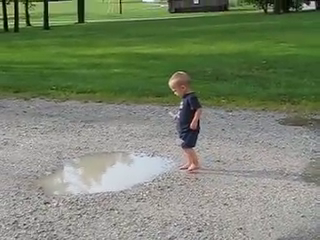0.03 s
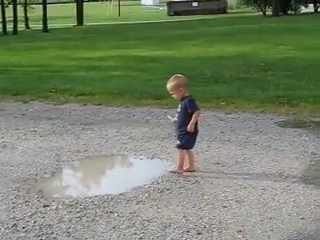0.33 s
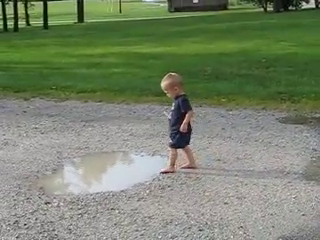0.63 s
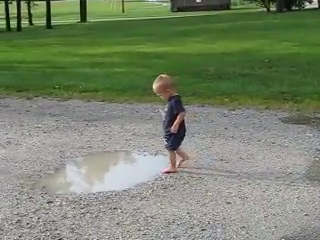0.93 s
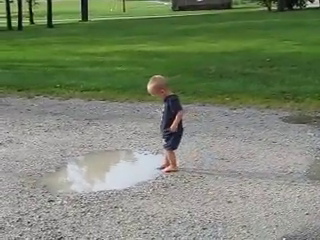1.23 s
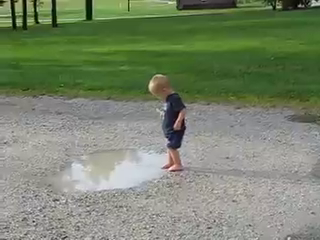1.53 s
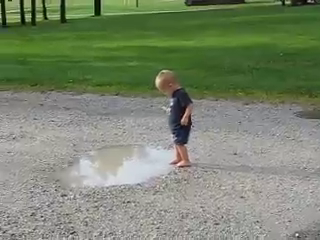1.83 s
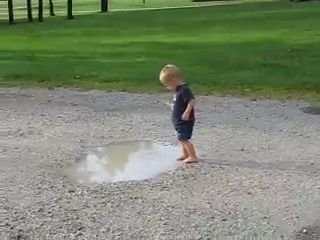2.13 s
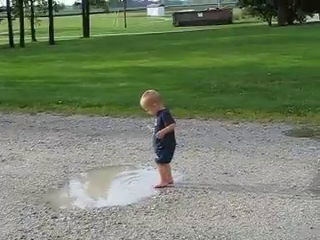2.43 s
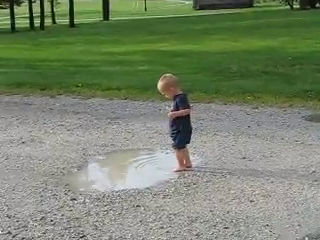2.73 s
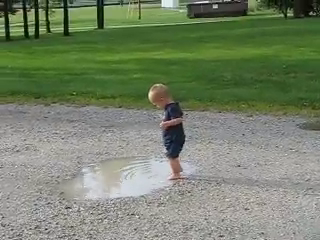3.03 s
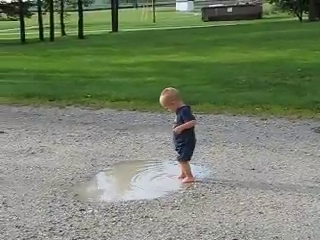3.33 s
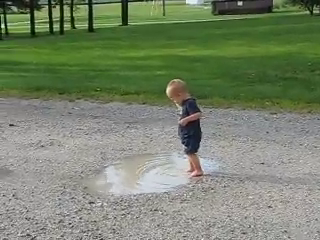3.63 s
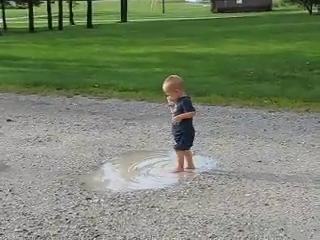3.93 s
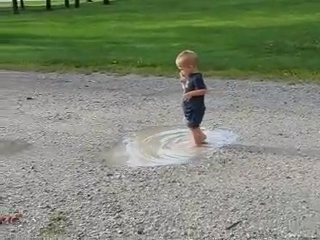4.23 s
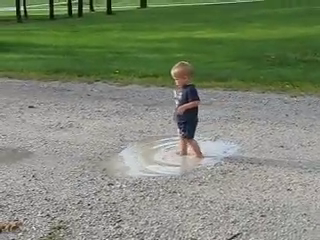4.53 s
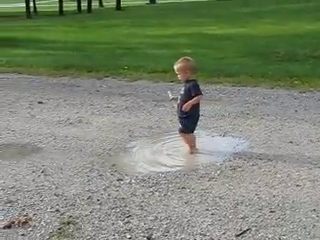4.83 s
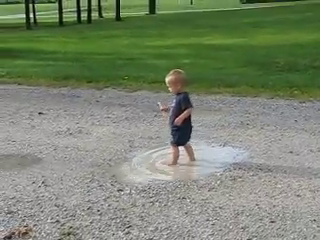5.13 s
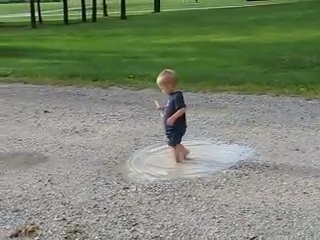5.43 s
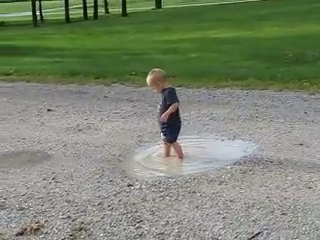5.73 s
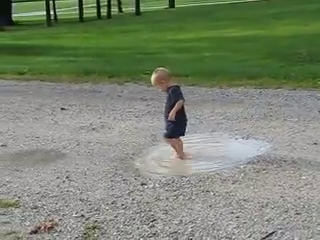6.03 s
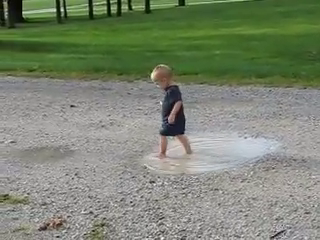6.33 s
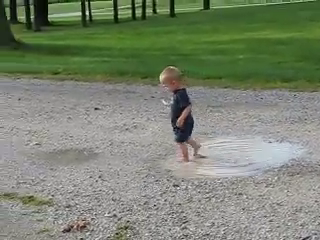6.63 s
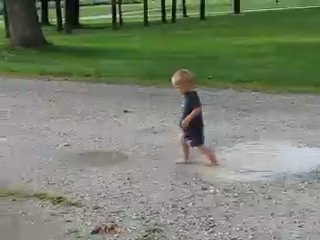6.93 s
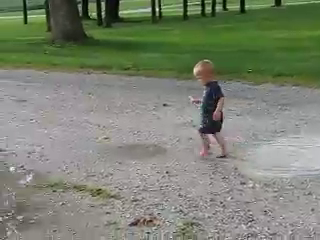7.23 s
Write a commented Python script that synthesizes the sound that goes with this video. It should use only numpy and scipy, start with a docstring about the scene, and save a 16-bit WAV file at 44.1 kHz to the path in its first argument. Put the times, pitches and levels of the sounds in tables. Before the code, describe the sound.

Small feet wade slowly through a shallow puddle with soft splashes and drips, over a steady motor hum and faint crickets.

```python
"""A gravel drive: a toddler wades slowly through a shallow puddle. Each step churns up swarms of tiny
bubbles as slosh and spray; soles and water smack down, drips fall back, larger bubbles ring singly.
A hand-held camera's casing takes a few hollow knocks. A big electric motor hums steadily nearby,
crickets chirp with their wings in the grass, and light wind rumbles on the microphone ports."""
import sys
import numpy as np
from scipy import signal
from scipy.fft import rfft, irfft, next_fast_len
from scipy.io import wavfile
from scipy.ndimage import uniform_filter1d, map_coordinates

SR = 44100
rng = np.random.default_rng(int(sys.argv[2]) if len(sys.argv) > 2 else 0)


def generate_wav(signal):
    """Clip the signal to [-1, 1] and save it as 16-bit WAV at the path in sys.argv[1]."""
    frames = np.transpose(np.atleast_2d(signal))
    scaled = np.clip(frames, -1, 1) * 32767
    pcm = np.round(scaled).astype(np.int16)
    wavfile.write(sys.argv[1], SR, pcm)


N = 325899


def amp(db):
    """Decibels to gain."""
    return 10 ** (np.asarray(db) / 20)


def unit(x):
    """Scale to rms 1."""
    return x / np.sqrt(np.mean(x ** 2) + 1e-20)


def along(points, hz):
    """(Hz, value) points read on a log axis."""
    point_hz, values = np.transpose(points)
    return np.interp(np.log(hz + 1), np.log(point_hz + 1), values)


def clock(length_s=N / SR):
    """Sample times in seconds."""
    return np.arange(round(length_s * SR)) / SR


def wobble(rate_hz):
    """A smooth random curve, rate_hz knots a second."""
    knots = rng.standard_normal(int(N * rate_hz / SR) + 4)
    return map_coordinates(knots, [np.arange(N) * rate_hz / SR])


def filtered(x, response):
    """Apply a gain given as a function of Hz."""
    size = x.shape[-1]
    padded = next_fast_len(size + 2048)
    return irfft(rfft(x, padded) * response(np.fft.rfftfreq(padded, 1 / SR)), padded)[..., :size]


def band(x, centre_hz, width_oct):
    """A bell-shaped band on a log-frequency axis."""
    return filtered(x, lambda hz: np.exp(-(np.log2((hz + 1) / centre_hz) / width_oct / 2) ** 2))


def placed(x, pan_db):
    """Stereo, leaning left by pan_db."""
    return x * amp([[pan_db / 2], [-pan_db / 2]])


def add(track, start_s, sound):
    """Mix a sound into the track."""
    part = track[..., max(round(start_s * SR), 0):][..., :sound.shape[-1]]
    part += sound[..., :part.shape[-1]]


# Each row: start in seconds, length in seconds, slosh level in dB, slosh centre in Hz,
# slosh spread in octaves, spray level in dB.
FOOTSTEPS = [(0.014, .095, -39, 1050, 0.29, -71), (1.152, 0.045, -38, 1490, 0.59, -51),
             (2.482, .085, -46, 2000, 0.89, -55), (2.677, .05, -40.5, 2750, 0.87, -60),
             (3.897, 0.027, -33, 1090, 0.41, -42.5), (4.574, 0.068, -40, 960, .44, -55.5),
             (5.226, 0.041, -45.5, 2500, 0.83, -56), (5.505, 0.036, -39, 2420, 0.55, -53),
             (6.047, .12, -51, 2800, .65, -65), (6.118, 0.043, -39.5, 700, 0.19, -66),
             (6.647, .045, -38.5, 1700, 0.72, -56), (6.787, .045, -50, 3940, 0.88, -58),
             (7.178, 0.044, -39.5, 1110, .3, -61), (7.338, 0.038, -51, 6000, 0.3, -51)]


def steps(spray_hz, spray_oct):
    """Each step sloshes water aside and throws up spray a moment later."""
    out = np.zeros((2, N))
    for start_s, length_s, slosh_db, slosh_hz, slosh_oct, spray_db in FOOTSTEPS:
        slosh = amp(slosh_db) * churn(length_s, slosh_hz, slosh_oct, fizz=0.64)
        spray = amp(spray_db) * churn(length_s, spray_hz, spray_oct, fizz=0.6)
        add(out, start_s, slosh)
        add(out, start_s + 0.13 * length_s, spray)
    return out


def churn(length_s, centre_hz, spread_oct, fizz):
    """Stirred water: a quick swell of tiny bubbles on a wash of noise."""
    swarm = bubble_swarm(length_s, centre_hz, spread_oct, per_s=900, decay_cycles=2.4, spread_db=4.0)
    wash = unit(band(rng.standard_normal((2, len(swarm))), centre_hz, 0.98 * spread_oct))
    swell = np.sin(np.pi * np.linspace(0, 1, len(swarm)) ** 0.88)
    return swell * unit(swarm + fizz * wash)


def bubble_swarm(length_s, centre_hz, spread_oct, per_s, decay_cycles, spread_db):
    """Tiny bubbles of mixed size start at random, each ringing for a few cycles."""
    size, t = round(length_s * SR), clock(0.0086)
    draws = np.clip(rng.standard_normal((int(per_s * length_s) + 4, 2)), -2, 2)
    hz = np.minimum(centre_hz * 2 ** (spread_oct * draws[:, :1]), 0.45 * SR)
    envelopes = np.exp(-hz * t / decay_cycles) * (1 - np.exp(-2 * hz * t))
    rings = amp(spread_db * draws[:, 1:]) * envelopes * np.sin(2 * np.pi * hz * t)
    positions = rng.integers(0, size, (len(hz), 1)) + np.arange(len(t))
    return unit(np.bincount(positions.ravel(), rings.ravel(), size)[:size])


# Each row: start in seconds, level at the crest in dB, centre in Hz, width in octaves, t60 in seconds.
WATER_SLAPS = [(1.1862, -37.5, 7000, .7, 0.016), (2.5297, -25, 1100, .8, 0.0083),
               (3.9, -27, 2200, .55, 0.0083), (5.5133, -21.5, 2840, .33, 0.0068),
               (5.646, -37, 7960, 0.31, 0.0063), (6.303, -33.5, 5160, 0.36, .013),
               (6.655, -23, 1000, 0.44, 0.01), (6.9162, -30.5, 6840, 0.59, 0.028)]


def slaps(rise_s):
    """A sole or a lump of water smacks down: a brief crack, partly different at each port."""
    out, t = np.zeros((2, N)), clock(0.079)
    for start_s, db, centre_hz, width_oct, t60_s in WATER_SLAPS:
        noise = rng.standard_normal(len(t)) + rng.standard_normal((2, len(t)))
        envelope = amp(-60 * t / t60_s) * (1 - np.exp(-t / rise_s))
        crack = unit(envelope * band(noise, centre_hz, width_oct)) / unit(envelope).max()
        add(out, start_s, amp(db) * crack)
    return out


# Each row: start in seconds, pitch in Hz, level in dB.
LARGE_BUBBLES = [(1.168, 2500, -38), (2.531, 4400, -30.5), (2.669, 2040, -29.5), (3.096, 2540, -33),
                 (3.837, 1150, -31), (3.919, 8100, -29), (4.847, 4750, -30.5), (5.502, 2130, -23.5),
                 (5.528, 4100, -27), (5.627, 2750, -28), (5.772, 2060, -30), (6.109, 2480, -27),
                 (6.254, 3340, -28), (6.26, 6900, -33), (6.647, 1750, -24), (6.658, 2760, -27),
                 (6.675, 4270, -28), (6.899, 4360, -32), (6.92, 4200, -23.5), (7.127, 3400, -33),
                 (7.147, 3500, -24)]


def large_bubbles(pan_db):
    """The larger trapped bubbles ring out singly around the feet."""
    out = np.zeros(N)
    for start_s, hz, db in LARGE_BUBBLES:
        add(out, start_s, amp(db) * plink(hz))
    return placed(out, pan_db)


def plink(hz, t60_cycles=25.6, pitch_rise=0.039):
    """A drop snaps on the surface and traps a bubble whose pitch climbs; small bubbles die sooner."""
    t60_s = t60_cycles / hz
    t = clock(1.5 * t60_s)
    ring = np.sin(2 * np.pi * hz * (t + pitch_rise * t * t / t60_s / 2))
    snap = 0.19 * unit(band(rng.standard_normal(len(t)), hz, width_oct=0.96))
    onset = 1 - np.exp(-(2 * hz * t) ** 2)  # the bubble pinches off within half a cycle
    return amp(-60 * t / t60_s) * onset * (ring + snap)


def drips(per_step, fall_s=0.45, centre_hz=6470, spread_oct=0.99, spread_db=6, width_db=8):
    """After every step a few drips fall back, louder as the feet get wetter."""
    soaked_s, soaked_db, dry_loss_db = 10, -33.5, 12
    out = np.zeros((2, N))
    for start_s, length_s, *_ in FOOTSTEPS:
        loudest_db = soaked_db - dry_loss_db * max(1 - start_s / soaked_s, 0)
        for delay, softness, pitch, pan in rng.random((per_step, 4)):
            hz = centre_hz * 2 ** (spread_oct * (2 * pitch - 1))
            drip = amp(loudest_db - spread_db * softness) * plink(hz)
            add(out, start_s + length_s + fall_s * delay, placed(drip, width_db * (pan - 0.5)))
    return out


def gravel(x, t60_s, tail_db):
    """The stony ground adds a very short scattered tail, different at each port."""
    t = clock(0.05)
    tail = rng.standard_normal((2, len(t))) * amp(-60 * t / t60_s)
    tail /= np.linalg.norm(tail[0])
    return x + amp(tail_db) * signal.fftconvolve(x, tail, axes=1)[:, :N]


# Each row: start in seconds, strike gain in dB, pitch in Hz, left minus right in dB.
CASING_KNOCKS = [(2.4846, -15, 910, 10), (3.068, -11, 1060, -7), (3.9005, -18.5, 900, 1)]
# Each row: multiple of the pitch, relative level in dB, t60 in seconds.
CASING_MODES = [(.76, -9.5, .02), (1, 0, 0.0059), (1.07, -5, 0.034), (1.2, -12, .018),
                (2.55, -11.5, 0.0084)]


def knocks(lag_s, highpass_hz, rise_s=0.00029):
    """A finger knocks the casing; the ring reaches the farther port a moment later."""
    out, t = np.zeros((2, N)), clock(0.06)
    for start_s, db, pitch_hz, pan_db in CASING_KNOCKS:
        ring = sum(amp(mode_db - 60 * t / t60_s) * np.sin(2 * np.pi * pitch_hz * ratio * t)
                   for ratio, mode_db, t60_s in CASING_MODES)
        left, right = placed(amp(db) * ring * (1 - np.exp(-t / rise_s)), pan_db)
        add(out[0], start_s + lag_s * (pan_db < 0), left)
        add(out[1], start_s + lag_s * (pan_db >= 0), right)
    highpass = signal.butter(2, highpass_hz, "high", fs=SR, output="sos")  # a small casing has no bass
    return signal.sosfilt(highpass, out)


# Each row of both tables: frequency in Hz, rms level in dB.
HUM_LINES = [(44.0, -49.5), (58.5, -43.5), (74.4, -54), (104.7, -49), (117.1, -46.5), (120.0, -24.5),
             (134.6, -42), (161.2, -51), (175.6, -53), (178.3, -67), (181.3, -52), (222.6, -62.5),
             (225.2, -62), (237.1, -51.5), (240.1, -34), (254.7, -44.5), (298.5, -51.5), (301.6, -56.5),
             (357.2, -58), (359.8, -49), (418.5, -52.5), (468.3, -55), (711.1, -85), (719.9, -65.5)]
WHINE_LINES = [(3512, -79), (3864, -76), (4098, -73), (7852, -76), (7882, -81)]


def motor():
    """Mains hum with sidebands spaced by the turning rotor, under a thin whine."""
    hum = tones(HUM_LINES, waver_db=0.15, drift_rad=0.29)
    whine = tones(WHINE_LINES, waver_db=2.5, drift_rad=0.16)
    return hum + whine


def tones(lines, waver_db, drift_rad):
    """Steady sines that waver in level and phase."""
    out, t = np.zeros(N), clock()
    for hz, db in lines:
        peak = np.sqrt(2) * amp(db + waver_db * wobble(2.17))
        phase = 2 * np.pi * (hz * t + rng.random()) + drift_rad * wobble(0.9)
        out += peak * np.sin(phase)
    return out


# Each row: centre in Hz, half-width in Hz, rms level in dB.
VENT_RESONANCES = [(374, 87, -51.5), (596, 17, -56.5), (987, 14, -57.5)]


def ventilation(flutter_db):
    """Air rushes through the motor's housing, fluttering on its way over the lawn."""
    out = np.zeros((2, N))
    for centre_hz, width_hz, db in VENT_RESONANCES:
        noise = rng.standard_normal(N) + 0.29 * rng.standard_normal((2, N))
        resonance = filtered(noise, lambda hz: 1 / (1 + ((hz - centre_hz) / width_hz) ** 2))
        out += amp(db + flutter_db * wobble(8)) * unit(resonance)
    return out


# Each row: pitch in Hz, chirp length in seconds, wing strokes per second, rms level in dB.
CRICKET_VOICES = [(7650, 0.093, 85, -62), (4250, .17, 45.6, -61.5), (4550, .17, 45.7, -62.5)]
# Each row: voice index, start in seconds, end in seconds, chirp period in seconds.
CHIRP_BOUTS = [(0, .15, 1.9, .414), (0, 2.33, 4.9, .414), (0, 5.51, 7.38, .465), (1, .22, 2.9, .505),
               (2, .04, 5.9, 1.89)]


def crickets(pulse_hz):
    """Three chirpers keep their own beat over a trill that gives way to a pulsing call."""
    chirps, t = np.zeros((2, N)), clock()
    for voice, start_s, end_s, period_s in CHIRP_BOUTS:
        pitch_hz, length_s, stroke_hz, db = CRICKET_VOICES[voice]
        for onset_s in np.arange(start_s, end_s, period_s):
            add(chirps, onset_s, amp(db) * chirp(length_s, stroke_hz, pitch_hz))
    handover = np.interp(t, [3.3, 4.2], [0, 1])
    trill = amp(-69.5) * (1 - handover) * wing(pitch_hz=6960, width_hz=70)
    pulses = np.sin(np.pi * pulse_hz * t + 0.5 * wobble(2.1)) ** 2
    call = amp(-70) * handover * pulses * wing(pitch_hz=6520, width_hz=130)
    return chirps + trill + call


def chirp(length_s, stroke_hz, pitch_hz):
    """A short train of wing strokes, each ringing in a narrow band."""
    t = clock(length_s)
    strokes = np.abs(np.sin(np.pi * t / length_s)) ** 0.25 * np.sin(np.pi * stroke_hz * t) ** 2
    return unit(strokes * band(rng.standard_normal((2, len(t))), pitch_hz, width_oct=0.011))


def wing(pitch_hz, width_hz):
    """A cricket's ringing wing, blurred by the grass on its way to each port."""
    noise = rng.standard_normal((2, N))
    return unit(filtered(noise, lambda hz: np.exp(-((hz - pitch_hz) / width_hz) ** 2)))


# Each row: time in seconds, level in dB.
GUST_CURVE = [(0, -62), (2.0, -49), (2.2, -35), (2.55, -30), (2.8, -45), (3.1, -47), (3.3, -51),
              (7.39, -53)]


def wind():
    """A light gust buffets the ports, partly each on its own."""
    swirl = rng.standard_normal(N) + 1.3 * rng.standard_normal((2, N))
    rumble = unit(band(swirl, centre_hz=36, width_oct=0.56))
    level_db = np.interp(clock(), *np.transpose(GUST_CURVE)) + 2.8 * wobble(8.1)
    return placed(amp(level_db) * rumble, pan_db=-7)


# Each row: frequency in Hz, relative spectral density in dB.
AIR_SPECTRUM = [(20, 6), (42, 8.5), (110, 7.5), (200, 6), (400, 1), (700, -5), (1050, -6.5), (2000, -12.5),
                (3300, -17.5), (4900, -22.5), (7600, -25), (8600, -30), (13000, -36), (16000, -40)]
# Each row: frequency in Hz, left-right correlation.
AIR_CORRELATION = [(30, 0.96), (130, 1), (290, 0.94), (640, 0.89), (1400, 0.74), (3000, 0.39), (6000, 0.1),
                   (15000, .1)]
# Each row: frequency in Hz, left minus right in dB.
AIR_BALANCE = [(60, -2.5), (200, 0), (700, 0), (1290, -1.2), (2380, -3.5), (4400, -1.5), (8120, 0),
               (15000, .8)]


def air(patchy_db, lag_s):
    """Distant outdoor rush in faint patches, arriving a little from the right."""
    def mid_side_gains(hz):
        angle = np.arccos(np.clip(along(AIR_CORRELATION, hz), -1, 1)) / 2
        return amp(along(AIR_SPECTRUM, hz)) * [np.cos(angle), np.sin(angle)]

    def port_gains(hz):
        lean = amp(along(AIR_BALANCE, hz) / 2)
        return [lean * np.exp(-2j * np.pi * hz * lag_s), 1 / lean]

    spectra = signal.stft(rng.standard_normal((2, N)), nperseg=512)[2]
    patches = uniform_filter1d(rng.standard_normal(spectra.shape[1:]), size=5, axis=0)
    patches = uniform_filter1d(patches, size=14, axis=1)
    noise = signal.istft(spectra * amp(patchy_db * unit(patches)), nperseg=512)[1][:, :N]
    mid, side = filtered(noise, mid_side_gains)
    rush = filtered(np.array([mid + side, mid - side]), port_gains)
    return amp(-35.0 + 0.2 * wobble(4.44)) * unit(rush)


def scene():
    """Feet in the puddle and casing knocks over the motor, the air and the insects."""
    machine = motor() + ventilation(flutter_db=3.0)
    outdoors = air(patchy_db=1, lag_s=0.000082) + wind() + crickets(pulse_hz=8.5)
    water = steps(spray_hz=7500, spray_oct=0.66) + slaps(rise_s=0.00084)
    water += large_bubbles(pan_db=-4.0) + drips(per_step=6)
    puddle = gravel(water, t60_s=0.033, tail_db=-9.0)
    return puddle + knocks(lag_s=0.00022, highpass_hz=600) + machine + outdoors


def record(dry):
    """The camera keeps nothing above its band limit."""
    return filtered(dry, lambda hz: hz < 15900)


dry = scene()
out = record(dry)
generate_wav(out)
```